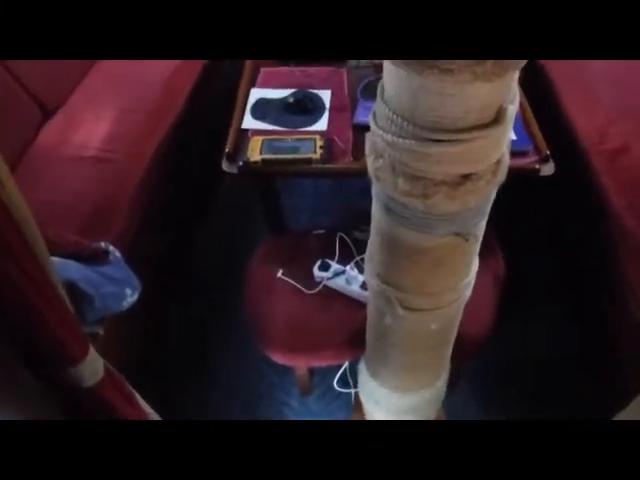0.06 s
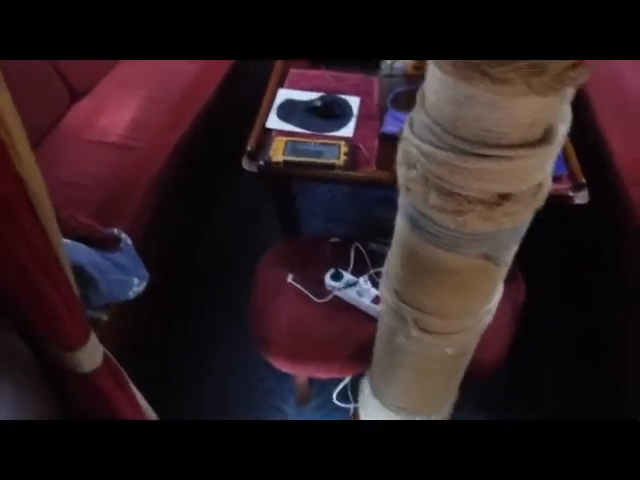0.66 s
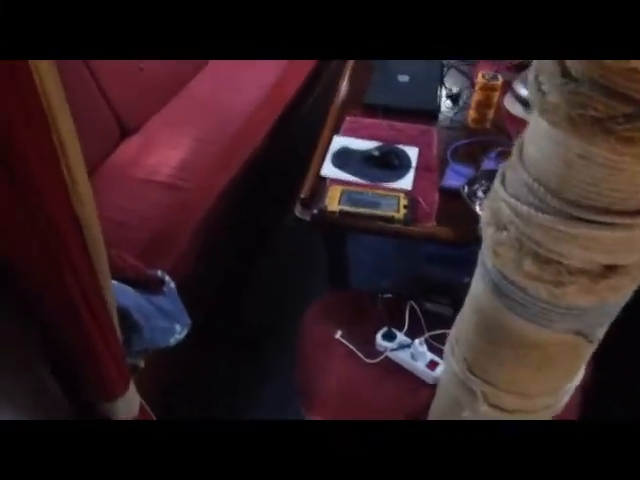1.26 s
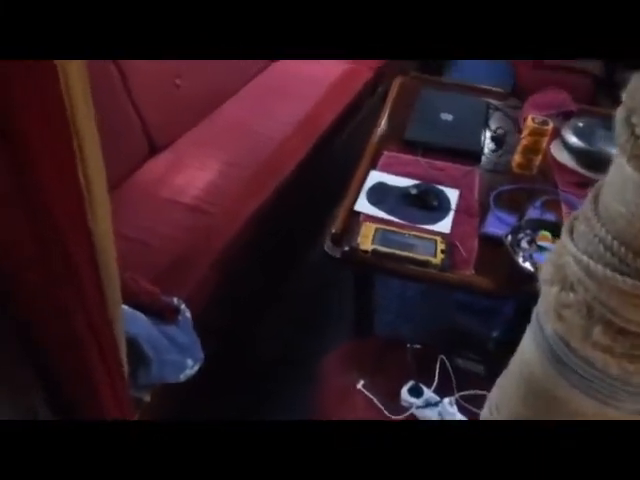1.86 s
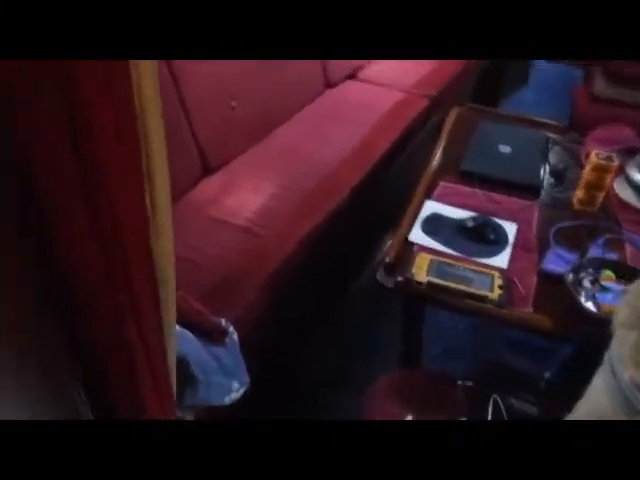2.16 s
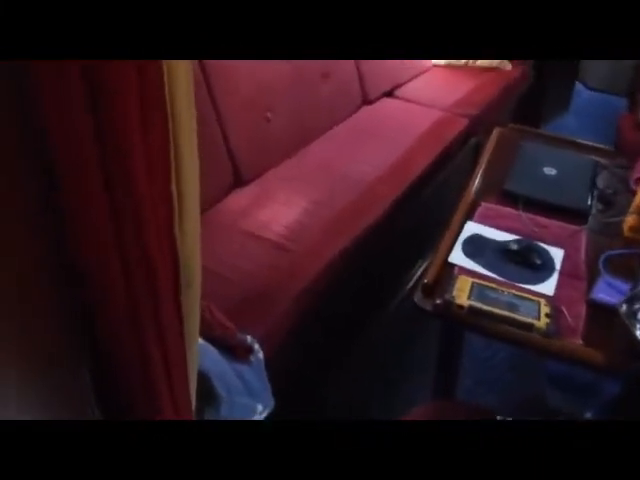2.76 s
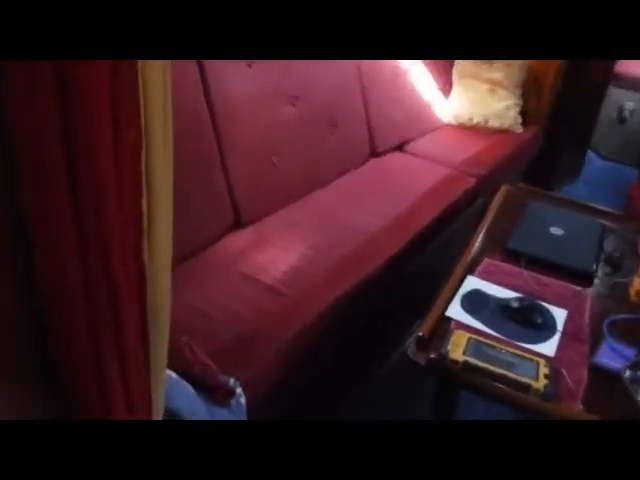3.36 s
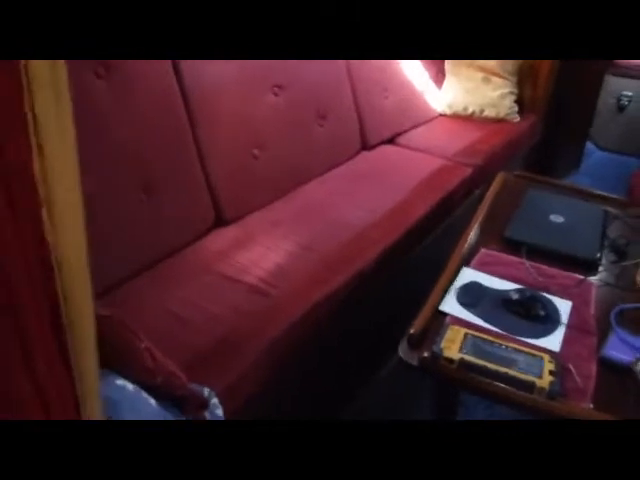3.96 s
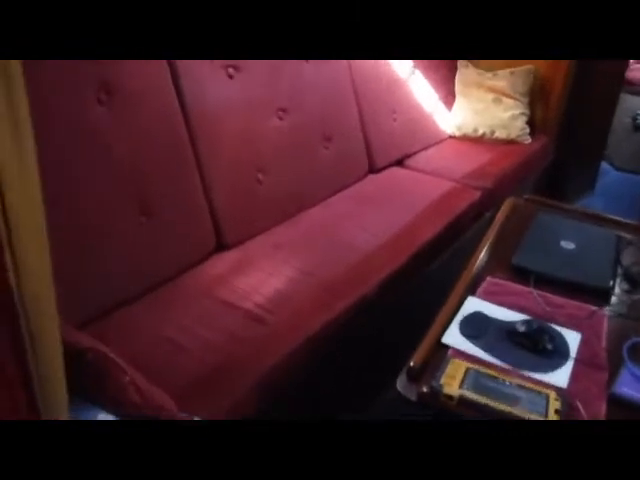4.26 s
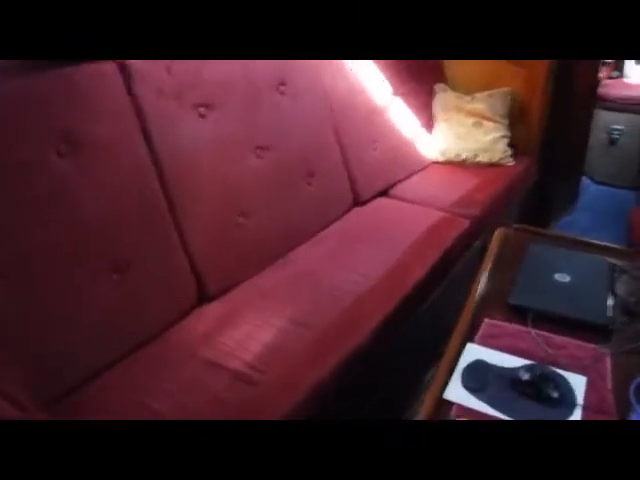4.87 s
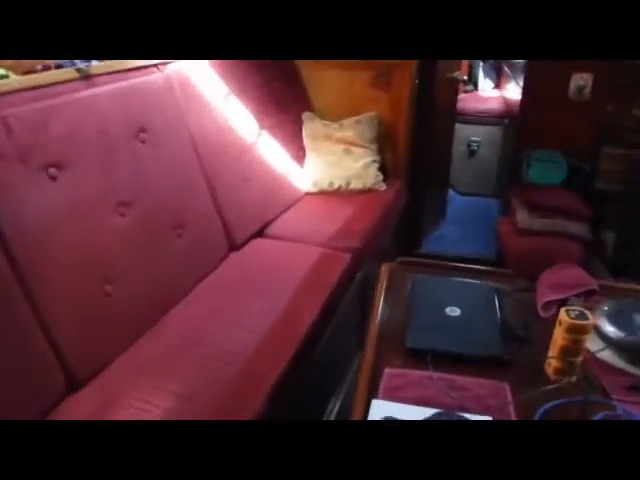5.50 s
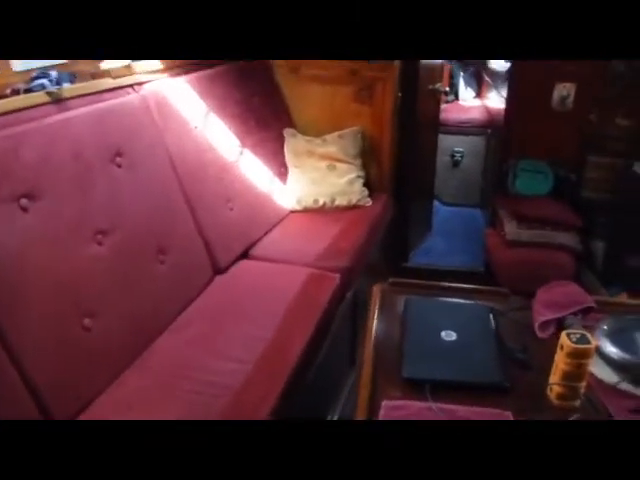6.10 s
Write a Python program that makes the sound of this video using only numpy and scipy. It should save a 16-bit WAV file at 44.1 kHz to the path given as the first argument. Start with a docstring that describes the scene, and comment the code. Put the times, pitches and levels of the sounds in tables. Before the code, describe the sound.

A faint, fluttering high hum and hiss fill a quiet boat cabin with almost no echo. Close by, shoes tap unevenly down wooden steps, and a loose one knocks sharply early on. Soft low thuds, short cloth swishes and a tiny zip-like tinkle mix with the steps, which gradually thin out. It ends with a cluster of close clicks and rubbing from fingers on the camera, the last click the sharpest.

```python
"""Footsteps descend slowly on wooden stairs into a small, upholstered boat cabin.
Each impact excites the step and the hull, and the cushions damp the echoes; one loose tread knocks
and rings in its modes. Sliding cloth and soles make friction noise, and a small metal pull tinkles.
Fingers click, rub and bump on a hand-held camera by stick-slip friction and soft impact.
A faint, high, fluttering hum hangs in the hiss of the quiet cabin."""
import sys
import numpy as np
from scipy.fft import rfft, irfft, next_fast_len
from scipy.io import wavfile
from scipy.ndimage import map_coordinates

SR = 44100
rng = np.random.default_rng(int(sys.argv[2]) if len(sys.argv) > 2 else 0)


def to_wav(s):
    """Save 16-bit WAV."""
    ch = np.atleast_2d(s).T  # columns
    pcm = np.round(np.clip(ch, -1, 1) * 32767)  # PCM
    wavfile.write(sys.argv[1], SR, pcm.astype(np.int16))


N = 275184

# light foot contacts on the stairs: start_s, level_db, wood_gain_db, tilt_db_per_octave
FOOT_TAPS = [(0.109, -29, -23.5, 0), (0.2343, -33.5, -32, 6.5), (0.6328, -32, -15, -4),
             (0.6428, -18.5, -21, 0), (0.783, -36.5, -37, 1), (0.801, -30.5, -19.5, -6),
             (0.843, -37.5, -12, -4), (0.8848, -44.5, -9.5, -4), (0.9586, -28, -40, 7.5),
             (0.9668, -31.5, -29, 7), (1.3783, -36, -38, 3), (1.5565, -23, -19.5, 8.5),
             (1.6261, -29, -15, -0.5), (1.6679, -35.5, -30, 7.5), (1.7158, -36, -33, -2),
             (1.9078, -33, -30, 14), (2.2938, -32, -22, 1.5), (2.3495, -25.5, -52.5, -1),
             (2.446, -36.5, -37.5, -0.5), (2.6699, -33, -32, 4), (2.7855, -32, -37, 6),
             (2.9228, -29.5, -31.5, 8.5), (2.9377, -21.5, -29, 1.5), (3.0096, -25.5, -27, 5.5),
             (3.3627, -21, -28.5, 2.5), (3.4405, -38, -17, -7), (3.8404, -32, -11.5, 13.5),
             (4.2838, -37, -14, 7), (4.309, -38, -21, -0.5), (4.794, -37, -20.5, -4),
             (4.9722, -33.5, -29.5, 1.5), (5.6506, -27, -28.5, 4.5)]
# impacts of the loose tread: start_s, level_db
TREAD_KNOCKS = [(1.5054, -12.5)]
# modes of the tread: pitch_hz, level_db, t60_s
TREAD_MODES = [(625, 0, .1), (840, -8, .095), (1085, -3, .085), (1473, -8, .08), (1800, -14, .085),
               (2168, -8, .065), (2729, -12, .07), (3188, -7, .065), (3682, -6, .08), (3955, -5, .075),
               (4020, -6, .07), (4503, -10, .08), (4738, -11, .09), (4886, -10, .09), (5305, -8, .11),
               (5832, -12, .11)]
# weight settling on the boards: start_s, boom_db, rumble_db
WEIGHT_THUDS = [(0.01, -76, -73), (.16, -68, -75), (0.28, -62.5, -72), (0.811, -54, -82), (0.884, -61, -82),
                (2.701, -65.5, -87.5), (2.97, -78, -73), (3.05, -63.5, -71), (3.669, -80, -71),
                (4.801, -71, -69.5), (5.16, -80, -73), (5.79, -66.5, -66)]
# strokes of sliding cloth and soles: centre_s, half_length_s, level_db
SWISH_STROKES = [(0.246, 0.048, -58.5), (0.622, 0.025, -59.5), (0.974, 0.02, -48), (1.072, 0.0158, -57),
                 (1.787, 0.0322, -50.5), (1.899, 0.015, -56), (2.321, 0.028, -55.5), (2.91, 0.0207, -59),
                 (3.052, 0.0186, -52.5), (3.636, 0.025, -49), (4.271, 0.028, -54), (4.819, 0.025, -59),
                 (4.888, 0.026, -54.5), (5.195, 0.046, -54.5), (5.455, 0.029, -60), (5.553, 0.0264, -47),
                 (5.698, 0.0633, -54.5), (5.949, 0.022, -56)]
# slips of the grip on the camera: start_s, level_db, body_gain_db, tilt_db_per_octave
GRIP_SLIPS = [(0.5838, -24.5, -41, -0.5), (0.5875, -29.5, -43, -4), (2.622, -37.5, -27, 4),
              (3.541, -33, -21, 4), (5.1335, -38, -20, 3), (5.279, -36.5, -27.5, -4),
              (5.2893, -36, -21, -3), (5.305, -37.5, -30, -11), (5.7238, -22.5, -14, 4),
              (5.767, -32.5, -17.5, 7), (5.9996, -33.5, -21, 1), (6.0459, -33, -24.5, 0),
              (6.1216, -29.5, -16, 5), (6.131, -28.5, -12.5, 4), (6.143, -35, -18, 9),
              (6.1523, -28.5, -18, 3), (6.1966, -14, -20, -4.5)]
# envelope of the fingers rubbing on the camera shell: time_s, level_db
RUB_ENVELOPE = [(5.6, -90), (5.68, -55), (5.73, -58), (5.88, -61.5), (6.0, -64), (6.09, -59), (6.14, -51.5),
                (6.24, -63.5)]
# soft bumps of the hand on the camera: start_s, level_db, time_constant_s
HAND_BUMPS = [(.277, -56.5, 0.002), (2.584, -58, 0.0009), (3.135, -56, 0.0008), (5.622, -57, 0.0032),
              (5.639, -50.5, 0.0022), (5.698, -51, 0.00076), (5.724, -52, 0.0005), (5.95, -47.5, 0.0016),
              (6.197, -34.5, 0.00047)]
# strikes of a small piece of metal, such as a zip pull: start_s, level_db
PULL_STRIKES = [(.587, -49), (1.38, -53), (2.693, -51.5), (2.92, -43), (3.058, -48), (4.313, -50.5)]
# modes of the pull: pitch_hz, level_db, t60_s
PULL_MODES = [(5320, -31, 0.11), (5964, -2, 0.069), (5920, -1, 0.074), (6640, -10, 0.093)]

# spectral densities: frequency_hz, level_db
SNAP_SPECTRUM = [(100, -44.5), (700, -13), (1500, -4), (2800, 0.5), (4000, -1), (4950, 2), (5320, 4),
                 (5650, 3), (6500, 0.5), (8200, -12.5), (9500, -22.5), (12500, -38)]  # sole on varnish
WOOD_SPECTRUM = [(80, -27), (200, -4), (350, -4), (550, -1.5), (800, 1), (1100, -4), (1800, -8.5),
                 (4000, -35)]  # wooden step
CRACK_SPECTRUM = [(60, -30.5), (300, -41), (600, -5), (1500, 3), (2800, 1), (4000, 6.5), (5500, 4),
                  (6500, -6), (8000, -21), (9500, -28), (12500, -30)]  # tread striking its frame
BOOM_SPECTRUM = [(30, -29), (70, -16), (125, 2), (190, -2), (235, -14), (288, 0), (370, -7), (600, -8.5),
                 (1500, -41)]  # boom of the hull
RUMBLE_SPECTRUM = [(15, -5), (35, -11), (58, -3), (80, -8), (140, -6.5), (400, -52)]  # deep shudder of the hull
CLOTH_SPECTRUM = [(100, -25), (800, -10.5), (2000, -6), (3500, -1.5), (5000, 4.5), (6000, 6.5), (7200, -2),
                  (8500, -7.5), (10000, -22), (12500, -18)]  # sliding fibres
SHELL_SPECTRUM = [(200, -61), (2000, -28.5), (3300, -14.5), (3930, -4.5), (4450, -8.5), (4900, -1),
                  (5400, 0), (5850, -4), (6350, -2.5), (7000, -9), (8000, -14), (12500, -29)]  # camera shell
BODY_SPECTRUM = [(50, -26), (290, 0), (620, -6), (1000, 1.5), (1250, -5), (1650, 4.5), (2000, 3),
                 (2500, 1.5), (3200, -15), (6000, -25)]  # gripped camera body
HUM_SPECTRUM = [(600, -31), (1050, -9), (1280, -2.5), (1400, 1), (1550, -2), (1850, -14), (2600, -40)]  # narrow band of hum
AIR_SPECTRUM = [(20, -28.5), (55, -5), (125, -3), (300, 0), (600, 1), (850, 4.5), (1150, -1), (1900, -1.5),
                (2800, -0.5), (4000, -2.5), (5200, 0.5), (7600, -3.5), (10000, -5), (12500, -6)]  # still air and hiss

RUMBLE_T60_S = 0.81  # the hull shudders on after a shift of weight


def foot_taps(snap_t60_s=0.072, boom_db=-24.5, boom_coupling=0.65):
    """Impact excitation: a sole snaps on the varnish and drives the step, which couples to the hull."""
    out = np.zeros(N)
    for start, db, wood_db, tilt in FOOT_TAPS:
        contact = amp(-10) * burst(SNAP_SPECTRUM, t60=0.011, direct=2.3, tilt=tilt)
        snap = amp(-13.5) * burst(SNAP_SPECTRUM, snap_t60_s, direct=4.0, linger_db=-26, tilt=tilt)
        wood = amp(wood_db - 3.5) * burst(WOOD_SPECTRUM, t60=0.13, direct=1.3, linger_db=-38)
        boom = amp(boom_db + boom_coupling * wood_db) * burst(BOOM_SPECTRUM, t60=0.325, direct=2.6)
        attack = 1 - np.exp(-np.arange(len(snap)) / SR / 0.00043)  # the sole takes a moment to flatten
        add(out, start, amp(db) * attack * (contact + snap + wood + boom))
    return out


def tread_knock():
    """Modal ringing: a loose tread slaps its frame under full weight, chatters once and shakes the hull."""
    out = np.zeros(N)
    for start, db in TREAD_KNOCKS:
        tread = amp(-14) * ring(TREAD_MODES, blur_cycles=0.03)
        crack = amp(-11.5) * burst(CRACK_SPECTRUM, t60=0.069, direct=4, linger_db=-24.5)
        frame = amp(-37) * burst(WOOD_SPECTRUM, t60=0.12)
        boom = amp(-38) * burst(BOOM_SPECTRUM, t60=0.512, tilt=-0.6)
        shudder = amp(-49.5) * burst(RUMBLE_SPECTRUM, RUMBLE_T60_S)
        add(out, start, amp(db) * (tread + crack + frame + boom + shudder))
        chatter = amp(db - 12) * burst(SNAP_SPECTRUM, t60=0.0165)
        add(out, start + 0.0022, chatter)
    return out


def weight_thuds():
    """Slow loading excites only low frequencies: the hull answers with a boom and a longer shudder."""
    out = np.zeros(N)
    for start, boom_db, rumble_db in WEIGHT_THUDS:
        boom = amp(boom_db) * burst(BOOM_SPECTRUM, t60=0.357, tilt=1.2)
        shudder = amp(rumble_db) * burst(RUMBLE_SPECTRUM, RUMBLE_T60_S)
        add(out, start, boom + shudder)
    return out


def cloth_swishes(grain_db=2.0):
    """Sliding friction: cloth and soles make short strokes of noise, grainy as the fibres catch."""
    out, t = np.zeros(N), np.arange(SR // 2) / SR
    middle = t.mean()
    for centre, half_length, db in SWISH_STROKES:
        fibres = amp(grain_db * wobble(500, size=len(t))) * rng.standard_normal(len(t))
        stroke = amp(db) * np.exp(-((t - middle) / half_length) ** 2)
        add(out, centre - middle, stroke * unit(tint(fibres, CLOTH_SPECTRUM, tilt=0.66)))
    return out


def pull_tinkles():
    """Free vibration: a swinging metal pull rings faintly in a few high modes."""
    out = np.zeros(N)
    for start, db in PULL_STRIKES:
        add(out, start, amp(db) * ring(PULL_MODES))
    return out


def grip_clicks(slip_at_0_db_s=0.002, length_exponent=0.17):
    """Stick-slip: each slip of the grip excites the camera's shell and body; harder slips last longer."""
    out, t = np.zeros(N), np.arange(SR // 20) / SR
    for start, db, body_db, tilt in GRIP_SLIPS:
        slip_s = slip_at_0_db_s * amp(length_exponent * db)
        slip = np.exp(-(t / slip_s) ** 4) + amp(-11.5 - 2000 * t)  # a pulse and its short tail
        shell = unit(tint(slip * rng.standard_normal(len(t)), SHELL_SPECTRUM, tilt))
        body = unit(tint(slip * rng.standard_normal(len(t)), BODY_SPECTRUM))
        add(out, start, amp(db) * rms(slip) * (amp(-10) * shell + amp(body_db) * body))
    return out


def finger_rub(catch_db=4, ticks_per_s=70):
    """Fine stick-slip of skin on the shell: hiss, stray ticks and a low rumble share one envelope."""
    skin = unit(amp(catch_db * wobble(320)) * rng.standard_normal(N))
    tick_onsets = rng.random(N) < ticks_per_s / SR
    ticks = unit(tick_onsets * (2 * rng.random(N) - 1))
    shell = unit(tint(skin + amp(-1) * ticks, SHELL_SPECTRUM, tilt=3.8))
    return amp(curve(RUB_ENVELOPE)) * (shell + amp(-19) * noise(RUMBLE_SPECTRUM))


def hand_bumps():
    """Soft impact: each bump on the camera is one compression followed by a rarefaction."""
    out, t = np.zeros(N), np.arange(SR // 8) / SR
    for start, db, time_constant in HAND_BUMPS:
        age = t / time_constant
        add(out, start, amp(db + 9.5) * age * (2 - age) * np.exp(-age))
    return out


def cabin_background(hum_db=-64, drift_db=0.8, flutter_db=1.56):
    """Modulated narrow-band noise hums like a small fan, amid hiss and a faint, wandering rumble."""
    rumble = amp(-91.5 + 3.3 * wobble(2.83)) * noise(RUMBLE_SPECTRUM)
    hum = amp(hum_db + drift_db * wobble(2.674) + flutter_db * wobble(36)) * noise(HUM_SPECTRUM)
    air = amp(-61.5) * noise(AIR_SPECTRUM)
    return hum + air + rumble


def burst(spectrum, t60, direct=0, linger_db=-60, tilt=0):
    """Diffuse reverberation: a direct impulse and dense, decaying echoes, with a weak lingering part."""
    t = np.arange(SR * 2 // 3) / SR
    decay = amp(-60 * t / t60) + amp(linger_db - 130 * t)
    echoes = decay * rng.standard_normal(len(t))
    echoes[0] += direct
    return unit(tint(echoes, spectrum, tilt)) * rms(decay)


def ring(modes, blur_cycles=0):
    """Modal superposition: damped sinusoids add; crowded neighbours blur the phase of each."""
    t = np.arange(SR * 2 // 3) / SR
    out = np.zeros(len(t))
    for hz, db, t60 in modes:
        phase = hz * t + rng.random() + blur_cycles * wobble(71, size=len(t))
        decay = amp(db + rng.normal() - 60 * t / t60)
        out += decay * np.sin(2 * np.pi * phase)
    attack = 1 - np.exp(-t / 0.0015)
    return out * attack


def tint(x, spectrum, tilt=0):
    """Minimum-phase filtering through a spectrum, tilted in dB per octave."""
    size = 2 * next_fast_len(len(x))
    hz, db = np.transpose(spectrum)
    tilted_db = db + tilt * np.log2(hz / hz[-1])
    bin_db = np.interp(np.log(np.fft.rfftfreq(size, 1 / SR) + 1), np.log(hz), tilted_db)
    cepstrum = irfft(np.log(amp(bin_db)))
    cepstrum[1:size // 2] *= 2  # folding the cepstrum makes the filter causal
    cepstrum[size // 2 + 1:] = 0
    return irfft(rfft(x, size) * np.exp(rfft(cepstrum)))[:len(x)]


def noise(spectrum):
    """Stationary coloured noise of rms 1."""
    return unit(tint(rng.standard_normal(N), spectrum))


def wobble(hz, size=N):
    """Smooth random modulation: a spline with hz knots a second."""
    knots = rng.standard_normal(int(size * hz / SR) + 4)
    return map_coordinates(knots, [np.arange(size) * hz / SR])


def amp(db):
    """Decibels to amplitude ratio."""
    return 10 ** (np.asarray(db) / 20)


def rms(x):
    """Root-mean-square amplitude."""
    return np.sqrt(np.mean(x ** 2) + 1e-20)


def unit(x):
    """Normalisation to rms 1."""
    return x / rms(x)


def curve(rows):
    """Linear interpolation of (time_s, value) rows to one value per sample."""
    return np.interp(np.arange(N) / SR, *np.transpose(rows))


def add(track, start_s, sound):
    """Superpose a sound on the track from start_s on."""
    part = track[max(round(start_s * SR), 0):][:len(sound)]
    part += sound[:len(part)]


def scene():
    """Linear superposition: all sources sum and reach both channels alike."""
    descent = foot_taps() + tread_knock() + weight_thuds() + cloth_swishes() + pull_tinkles()
    handling = grip_clicks() + finger_rub() + hand_bumps()
    mono = descent + handling + cabin_background()
    return np.array([mono, mono])


def record(dry, cutoff_hz=12650, transition_hz=300):
    """Band limiting: a steep low-pass filter removes the highest treble."""
    size = next_fast_len(N + SR // 2)
    hz = np.fft.rfftfreq(size, 1 / SR)
    passband = np.clip((cutoff_hz - hz) / transition_hz + 0.5, 0, 1)
    return irfft(rfft(dry, size) * passband, size)[:, :N]


dry = scene()
out = record(dry)
to_wav(out)
```